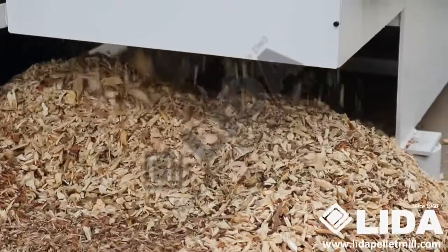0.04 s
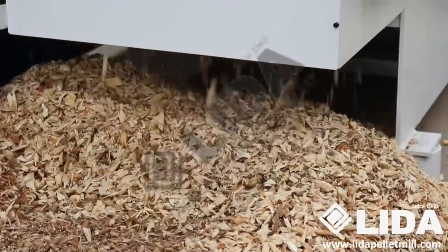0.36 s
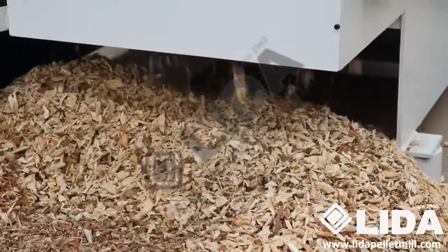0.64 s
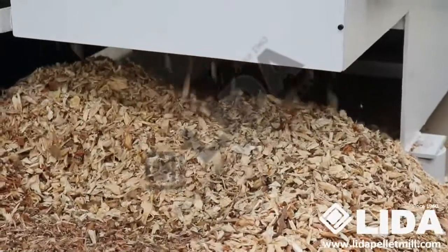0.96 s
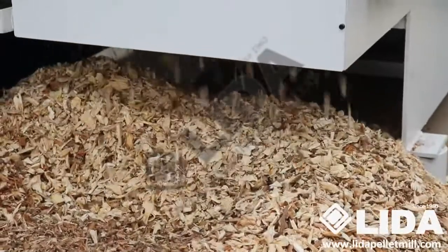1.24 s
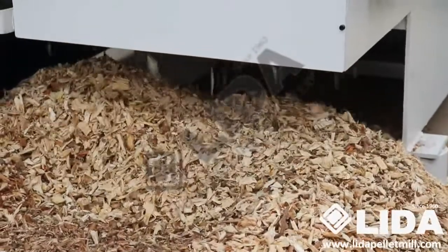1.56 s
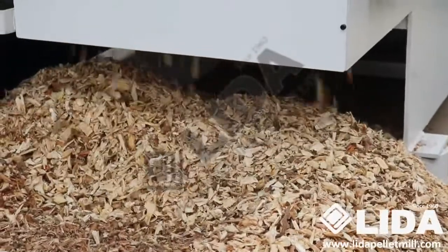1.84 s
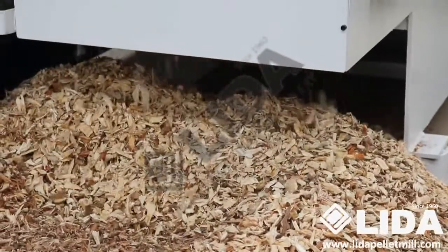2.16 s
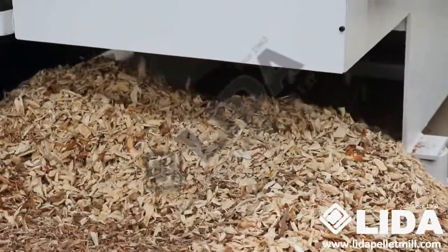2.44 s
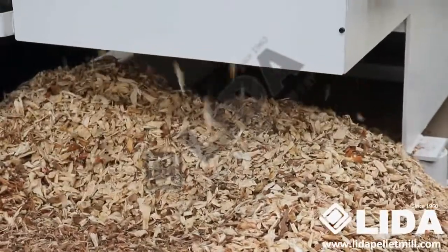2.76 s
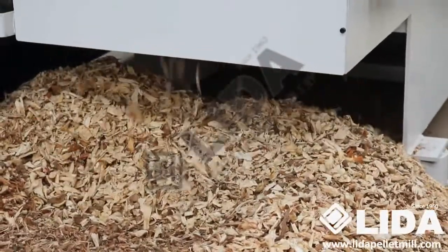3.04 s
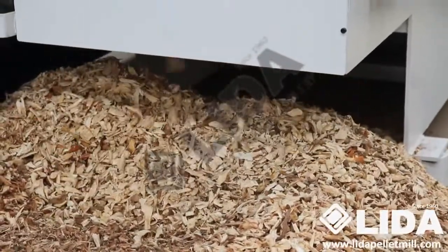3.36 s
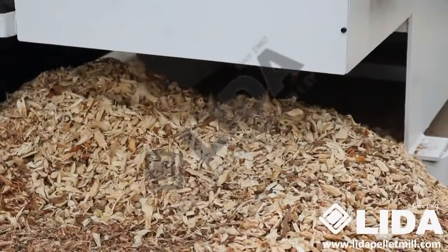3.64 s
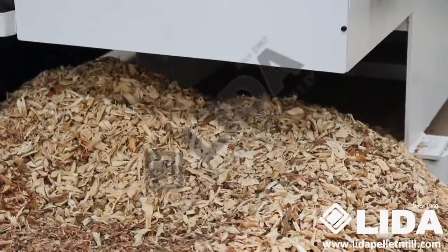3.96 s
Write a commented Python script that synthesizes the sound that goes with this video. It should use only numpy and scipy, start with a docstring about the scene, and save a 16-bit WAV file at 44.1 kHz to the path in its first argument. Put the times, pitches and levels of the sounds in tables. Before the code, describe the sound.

A wood shredder roars steadily, with rattling chips and scattered crunches and knocks.

```python
"""Wood shredder, close up

One microphone stands close to a running shredder. The drive rumbles and hums, the frame shudders
and the rotor whines as it churns wood in a ringing steel housing. Chips rattle through the chute
and patter onto the heap below. Larger pieces crunch in the cutters, thump the chamber wall and
bang against the knives."""
import sys
import numpy as np
from scipy import signal
from scipy.fft import rfft, irfft, next_fast_len
from scipy.io import wavfile
from scipy.ndimage import uniform_filter1d, map_coordinates

SR = 44100
rng = np.random.default_rng(int(sys.argv[2]) if len(sys.argv) > 2 else 0)


def bounce(signal):
    """Save signal as a 16-bit WAV file at the path given by the first command-line argument."""
    frames = np.transpose(np.atleast_2d(signal))
    limited = np.clip(frames, -1, 1)
    pcm = np.round(limited * 32767).astype(np.int16)
    wavfile.write(sys.argv[1], SR, pcm)


N = 176400
TOP_HZ = 7700  # upper edge of what the microphone hears


def amp(db):
    return 10 ** (np.asarray(db) / 20)


def unit(x):
    return x / np.sqrt(np.mean(x ** 2) + 1e-20)


def curves(rows):
    """One value per sample for each column after the time."""
    times, *columns = np.transpose(rows)
    return [np.interp(np.arange(N) / SR, times, column) for column in columns]


def wobble(rate):
    """A smooth random curve, rate knots a second."""
    return map_coordinates(rng.standard_normal(2000), [np.arange(N) * rate / SR + 3], mode="mirror")


def filtered(x, response):
    """x through a gain that depends on frequency."""
    size = next_fast_len(N + 8192)
    return irfft(rfft(x, size) * response(np.fft.rfftfreq(size, 1 / SR)), size)[:N]


def coloured(x, spectrum):
    """x shaped by rows of freq_hz, gain_db; rms 1."""
    freqs, db = np.transpose(spectrum)
    def gain(hz):
        return amp(np.interp(np.log(hz + 1), np.log(freqs), db, left=-100, right=-100))
    return unit(filtered(x, gain))


def tone(hz, db, flutter_hz, swing_db, drift_hz=0.866):
    """A turning part's tone, slightly unsteady in pitch and level."""
    pitch = hz + drift_hz * wobble(3.067) + flutter_hz * wobble(30.38)
    peak = amp(db + swing_db * wobble(8)) * np.sqrt(2)
    return peak * np.sin(2 * np.pi * (np.cumsum(pitch) / SR + rng.random()))


def impacts(rate, spread_db, spots=4, echo_t60=0.055, echo_db=-2.5):
    """Uneven random blows, rate a second, at spots in the chamber that each have a short echo; rms 1."""
    hits = (rng.random(N) < rate / SR) * rng.choice([-1, 1], N)
    blows = hits * amp(spread_db * np.clip(rng.standard_normal(N), -2, 2))
    spot = rng.integers(spots, size=N)
    out, t = blows.copy(), np.arange(SR // 10) / SR
    for k in range(spots):
        echo = rng.standard_normal(len(t)) * amp(-60 * t / echo_t60)
        out += amp(echo_db) * signal.oaconvolve(blows * (spot == k), echo / np.linalg.norm(echo))[:N]
    return unit(out)


def pelted(modes):
    """Steel modes kept ringing by a hail of chips; rms 1."""
    t = np.arange(SR // 2) / SR
    ring = sum(amp(db - 60 * t / t60) / np.sqrt(t60) * np.sin(2 * np.pi * hz * t)
               for hz, db, t60 in modes)
    return unit(signal.fftconvolve(impacts(rate=790, spread_db=1.5), ring)[:N])


# Relative levels of the drive, close by: time_s, rumble_db, hum_db
DRIVE_LEVELS = [(0, -35, -49), (.22, -35, -51), (.4, -29, -49), (.5, -32.5, -39), (1.25, -30.5, -36.5),
                (1.8, -35.5, -32.5), (2.3, -28.5, -31), (2.52, -32.5, -36), (3.0, -28, -32.5),
                (3.6, -31.5, -32), (4, -28, -35)]
# Spectrum of the rumble: freq_hz, gain_db
RUMBLE_SPECTRUM = [(35, -45.5), (60, -22), (85, -6), (99, -6), (118, 3.5), (142, 0), (170, -5.5), (195, 4),
                   (230, -0.5), (265, 0), (290, -32.5), (450, -35)]
def drive(rumble_gain_db=0.5):
    """The drive turns with a low rumble and its main hum."""
    rumble_db, hum_db = curves(DRIVE_LEVELS)
    rumble = amp(rumble_db + rumble_gain_db) * coloured(rng.standard_normal(N), RUMBLE_SPECTRUM)
    return rumble + tone(hz=129.2, db=hum_db, flutter_hz=2.51, swing_db=2.5)


# The frame's shudder at the microphone: time_s, level_db
SHUDDER_LEVELS = [(0, -56), (.58, -45), (.73, -37), (.9, -44), (1.1, -37), (1.4, -51), (2.6, -57),
                  (3.27, -37.5), (3.6, -37), (4, -64)]
# Its spectrum: freq_hz, gain_db
SHUDDER_SPECTRUM = [(10, -43), (25, -26.5), (42, -9), (65, 0), (85, 12), (130, -30.5)]
def frame_shudder():
    """The frame shakes in swells of deep noise."""
    return amp(curves(SHUDDER_LEVELS)[0]) * coloured(rng.standard_normal(N), SHUDDER_SPECTRUM)


# The rotor's whine, close by: time_s, level_db
WHINE_LEVELS = [(0, -37.5), (.3, -35.5), (.55, -38.5), (1.8, -39.5), (1.95, -37.5), (2.5, -36.5),
                (3.25, -34.5), (4, -34.5)]
# Weaker tones of drive and rotor: pitch_hz, level_db
WEAK_TONES = [(69.5, -49.5), (88, -44), (112, -56), (154, -43), (261, -43.5), (300, -47.5), (598.4, -45.5),
              (1008, -45), (1186, -46.5), (1585, -46), (1782, -48.5), (2336, -47), (2492, -57),
              (3019, -51.5)]
def rotor_whine():
    """The spinning rotor whines over the machine's weaker tones."""
    whine = tone(hz=527, db=curves(WHINE_LEVELS)[0], flutter_hz=3.5, swing_db=3)
    return whine + sum(tone(hz, db, flutter_hz=2.75, swing_db=3.5) for hz, db in WEAK_TONES)


# Relative levels of the roar from the chamber: time_s, low_db, upper_db
CHURN_LEVELS = [(0.0, -32, -31), (1.14, -32, -30), (1.5, -30, -32), (1.65, -30.5, -31), (1.92, -33, -30),
                (2.23, -31.5, -30.5), (2.67, -33, -30), (3.12, -30.5, -30.5), (3.7, -28.5, -31),
                (4.0, -27.5, -30)]
# Spectra of the low and the upper roar: freq_hz, gain_db
LOW_SPECTRUM = [(150, -35), (290, -1.5), (390, 1), (500, 0.5), (575, -1.5), (660, -2.5), (800, -2.5),
                (1000, -17.5), (1500, -43)]
UPPER_SPECTRUM = [(500, -22.5), (750, -10), (890, 5.5), (1130, 3), (1440, 2), (1520, -9), (1700, 5.5),
                  (1830, -3), (1920, 0), (2400, -2), (2750, -5), (3030, -5), (3350, -13), (4100, -16),
                  (5500, -52.5)]
def churn(low_gain_db=-0.78, upper_gain_db=-1):
    """Wood tumbles in the chamber: a roar of countless blows that surge together."""
    low_db, upper_db = curves(CHURN_LEVELS)
    surge_db = 0.43 * wobble(22.29)
    low = coloured(impacts(rate=2500, spread_db=4.5), LOW_SPECTRUM)
    upper = coloured(impacts(rate=3000, spread_db=0.5), UPPER_SPECTRUM)
    return amp(surge_db) * (amp(low_db + low_gain_db) * low + amp(upper_db + upper_gain_db) * upper)


# Relative level of the chip stream: time_s, level_db
CHIP_FLOW = [(0, -34.5), (.2, -37), (.33, -34), (.52, -36), (.7, -36), (1.3, -36), (1.43, -37.5),
             (1.75, -36.5), (2.05, -34.5), (2.6, -35.5), (3.05, -38), (3.4, -38.5), (3.57, -41), (4, -38.5)]
# Spectrum of the chips: freq_hz, gain_db
CHIP_SPECTRUM = [(1500, -26.5), (3000, 4), (3700, 5.5), (4300, 6), (4720, 5), (5000, 2), (5450, 3),
                 (6100, 3), (6500, 1), (7100, 1), (7800, -1)]
# Modes of the steel chute: pitch_hz, level_db, t60_s
CHUTE_MODES = [(3632, 1, 0.087), (4744, -2, 0.088), (5510, 1.5, 0.065), (6570, 0, 0.038)]
def chip_stream(gain_db=-6, chute_db=-5):
    """Small chips rattle through the chute and patter on the heap below."""
    landings = impacts(rate=4600, spread_db=3.5) + 0.65 * rng.standard_normal(N)
    patter = coloured(patchy(landings, depth_db=4.5), CHIP_SPECTRUM)
    ringing = coloured(clinks(), CHIP_SPECTRUM) + amp(chute_db) * pelted(CHUTE_MODES)
    return amp(curves(CHIP_FLOW)[0] + gain_db) * (patter + ringing)


def patchy(x, depth_db):
    """x with narrow patches of colour that come and go."""
    spectra = signal.stft(x, nperseg=1024)[2]
    patches = uniform_filter1d(rng.standard_normal(spectra.shape), size=3, axis=0)  # across pitch
    patches = uniform_filter1d(patches, size=30, axis=1)  # across time
    return signal.istft(spectra * amp(depth_db * unit(patches)), nperseg=1024)[1][:N]


def clinks(per_second=190, lowest_hz=1500, t60=0.57):
    """Each chip that hits the chute rings briefly at a pitch of its own."""
    out, t = np.zeros(N + SR), np.arange(SR // 4) / SR
    for when, pitch, softness in rng.random((int(per_second * N / SR), 3)):
        hz = lowest_hz + pitch * (TOP_HZ - lowest_hz)
        db = -2 * np.log(max(softness, 0.05))  # a few stand out, by up to 6 dB
        out[int(when * N):][:len(t)] += amp(db - 60 * t / t60) * np.sin(2 * np.pi * hz * t)
    return out[:N]


# Modes of the steel housing, levels relative: pitch_hz, level_db, t60_s
HOUSING_MODES = [(212, 4, 0.14), (456, -6.5, 0.062), (641, 1, 0.33), (928, -5.5, 0.58), (1018, -7, 0.091),
                 (1046.6, 1.5, 0.3), (1494, -1.5, 0.11), (1815, 2.5, 0.24), (1980, -6, 0.31),
                 (2457, -2.5, 0.075), (3030, -0.5, 0.044)]
def housing_ring(level_db=-34):
    """The housing rings as chips pelt it from inside."""
    return amp(level_db) * pelted(HOUSING_MODES)


# Pieces in the cutters, levels relative: start_s, length_s, thud_db, knock_db, crack_db, splinter_db
CAUGHT_PIECES = [(0.078, 0.012, -31, -35, -27, -37), (0.261, 0.062, -47, -33, -29, -41),
                 (0.386, 0.0084, -20, -38, -29, -41), (0.42, 0.011, -30, -37, -28, -29.5),
                 (0.549, 0.011, -20.5, -19, -33, -30), (0.638, 0.015, -19, -21.5, -32, -31.5),
                 (0.852, 0.015, -22, -32, -35, -55), (0.942, 0.015, -29, -24, -35, -29.5),
                 (0.969, 0.025, -23.5, -19, -28, -44), (1.185, 0.0088, -32, -22, -25, -32),
                 (1.211, 0.017, -33, -25, -31, -25.5), (1.256, 0.017, -20.5, -19.5, -50, -26),
                 (1.337, 0.036, -24.5, -28.5, -44, -49), (1.665, 0.016, -23, -33, -24, -26.5),
                 (2.366, 0.018, -20, -19.5, -24.5, -40), (2.944, 0.032, -25, -23.5, -39, -35),
                 (3.179, 0.0092, -51, -21, -31, -35), (3.234, 0.024, -52, -26.5, -26, -33),
                 (3.267, 0.011, -20.5, -26, -47, -40), (3.349, 0.013, -42, -23, -40, -31.5),
                 (3.465, 0.012, -19.5, -22, -26, -28), (3.584, 0.0081, -44, -23, -26, -32),
                 (3.794, 0.0089, -20, -21, -29, -36), (3.869, 0.041, -29, -24, -27.5, -33)]
# Bands of thud, knock, crack and splinter: low_hz, high_hz
CRUNCH_BANDS = [(250, 755), (800, 1970), (2100, 3010), (3800, 7740)]
def crunches(gain_db=-4.5, attack_s=0.0036, tail_t60=0.14, blow_db=-7, blow_t60=0.014):
    """Each larger piece takes a hard first blow and breaks in a burst of fractures."""
    fractures = impacts(rate=2600, spread_db=4.5)
    bands = [signal.sosfilt(signal.butter(2, edges, "band", fs=SR, output="sos"), fractures)
             for edges in CRUNCH_BANDS]
    out, t = np.zeros(N), np.arange(SR // 4) / SR
    attack = 1 - np.exp(-t / attack_s)
    blow = amp(blow_db - 60 * t / blow_t60)
    for start_s, length_s, *levels in CAUGHT_PIECES:
        span = slice(round(start_s * SR), round(start_s * SR) + len(t))
        breaking = amp(-60 * np.maximum(t - length_s, 0) / tail_t60)
        envelope = (attack * (breaking + blow))[:len(out[span])]
        envelope_rms = np.sqrt(np.mean(envelope ** 2))
        for db, band in zip(levels, bands):
            out[span] += amp(db + gain_db) * envelope_rms * unit(band[span] * envelope)
    return out


# Solid pieces hitting the chamber wall, levels relative: start_s, pitch_hz, level_db, t60_s
WALL_HITS = [(0.253, 247, -19, 0.11), (.389, 212, -16, .14), (.41, 2331, -29.5, 0.2),
             (0.681, 2336, -27.5, .3), (0.769, 212, -21, 0.11), (0.867, 404, -23, 0.14),
             (0.978, 1360, -25, 0.095), (.98, 3500, -29.5, 0.19), (1.265, 2036, -15, 0.046),
             (1.265, 740, -21, 0.064), (1.274, 886, -18, 0.072), (1.349, 450, -24, 0.21),
             (1.362, 3020, -35.5, .35), (1.399, 197, -19, 0.13), (1.671, 2417, -26, 0.17),
             (2.375, 2630, -21.5, 0.057), (2.382, 1690, -17.5, 0.066), (3.28, 946, -18.5, 0.075),
             (3.355, 892, -22.5, 0.13), (3.47, 1766, -20.5, 0.064), (3.488, 1710, -20.5, 0.056),
             (3.497, 467, -23.5, 0.13), (3.507, 1574, -21, 0.066), (3.803, 1780, -22, .06)]
def wall_thumps(gain_db=2, attack_s=0.0013):
    """A solid piece strikes the wall and rings briefly at its own pitch."""
    out, t = np.zeros(N + SR), np.arange(SR // 3) / SR
    for start_s, hz, db, t60 in WALL_HITS:
        envelope = (1 - np.exp(-t / attack_s)) * amp(db + gain_db - 60 * t / t60)
        out[round(start_s * SR):][:len(t)] += envelope * np.sin(2 * np.pi * hz * t)
    return out[:N]


# Hard knife blows inside the chamber, levels relative: start_s, level_db, pitch_hz
KNIFE_BLOWS = [(1.2631, -14, 1300), (1.366, -16, 620), (2.372, -10, 1210), (2.375, -11, 600),
               (2.3855, -13, 2200), (2.392, -12, 1700), (2.429, -13, 1350), (3.357, -10, 1500),
               (3.4725, -4, 1900), (3.479, -13, 700)]
def knife_strikes(gain_db=-3.5, decay_cycles=11, wall_db=-3.5, wall_t60=0.042):
    """A knife meets wood: a sharp knock of a few cycles, which the chamber walls scatter."""
    out, t = np.zeros(N + SR), np.arange(SR // 20) / SR
    for start_s, db, hz in KNIFE_BLOWS:
        knock = np.sin(2 * np.pi * hz * t) * amp(-60 * t * hz / decay_cycles)
        knock *= amp(db + gain_db) / knock.max()
        walls = rng.standard_normal(len(t)) * amp(-60 * t / wall_t60)
        echo = signal.fftconvolve(knock, walls / np.linalg.norm(walls))[:len(t)]
        out[round(start_s * SR):][:len(t)] += knock + amp(wall_db) * echo
    return out[:N]


def scene():
    """The whole shredder in mono, from one spot close by."""
    running = drive() + frame_shudder() + rotor_whine() + churn() + chip_stream() + housing_ring()
    return (running + crunches() + wall_thumps() + knife_strikes())[None]


def record(dry):
    """The microphone feeds a recorder that cuts off steeply above TOP_HZ."""
    return filtered(dry[0], lambda hz: 1 / np.sqrt(1 + np.minimum(hz / TOP_HZ, 2) ** 300))[None]


dry = scene()
out = record(dry)
bounce(out)
```